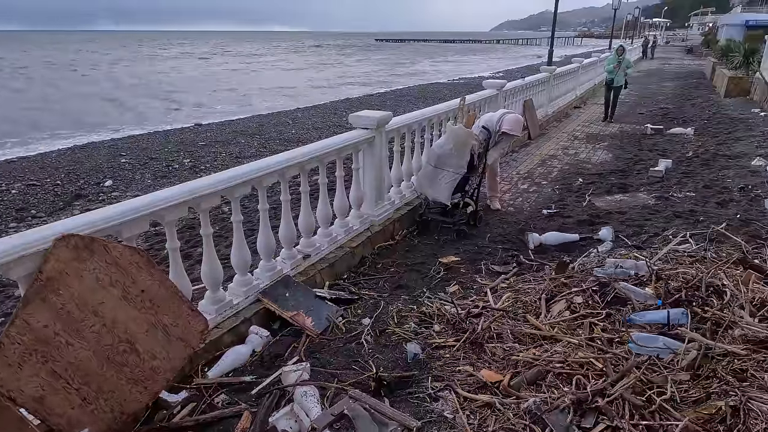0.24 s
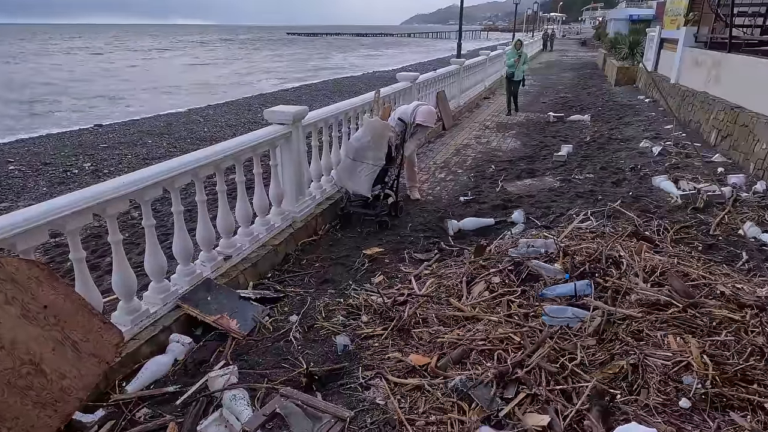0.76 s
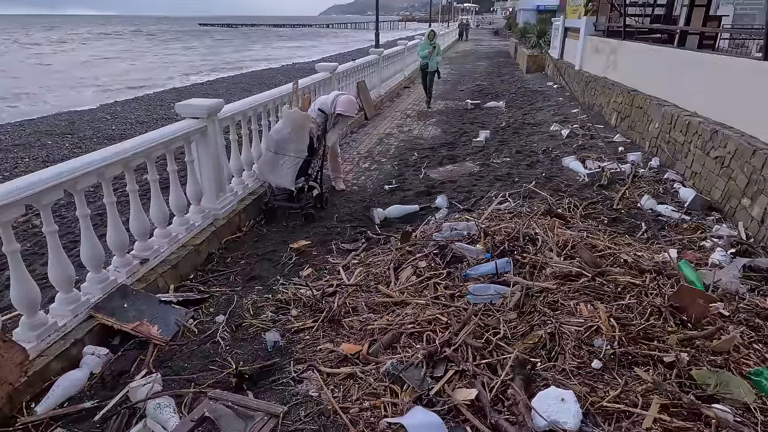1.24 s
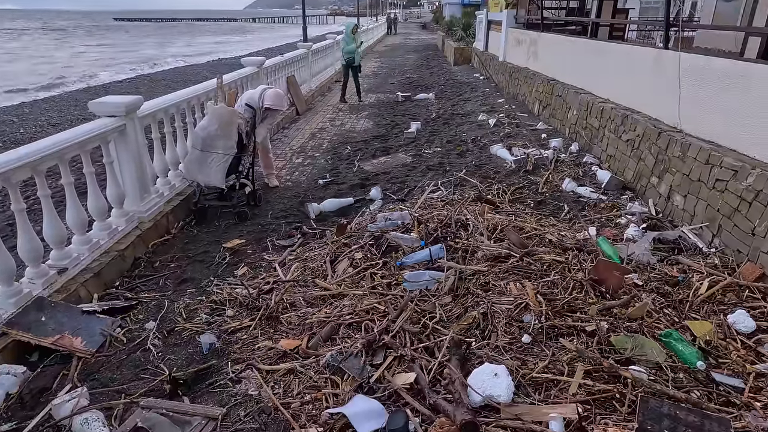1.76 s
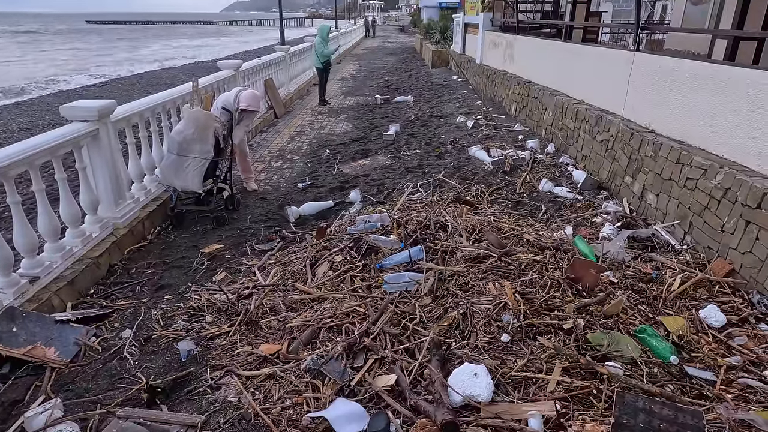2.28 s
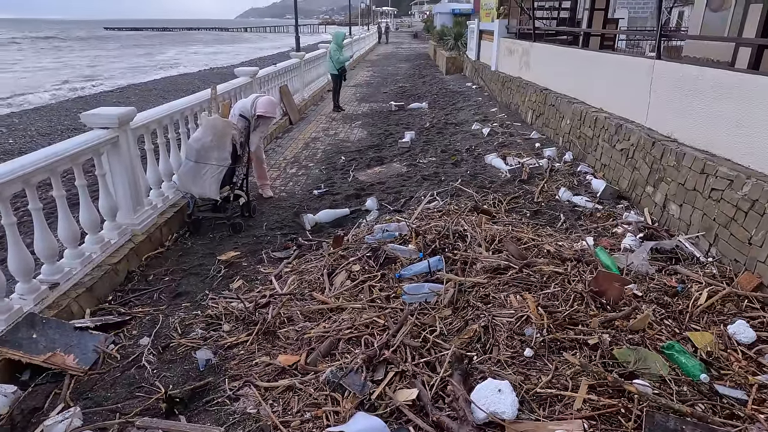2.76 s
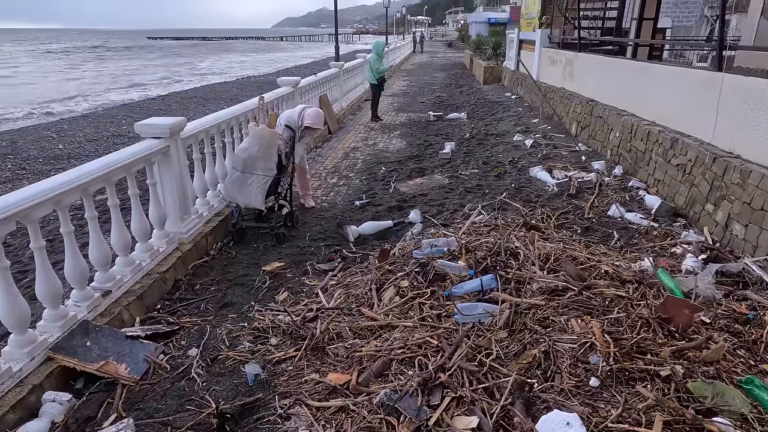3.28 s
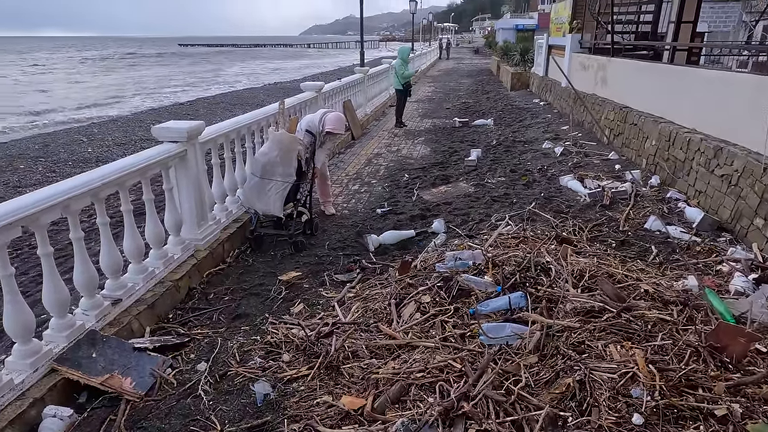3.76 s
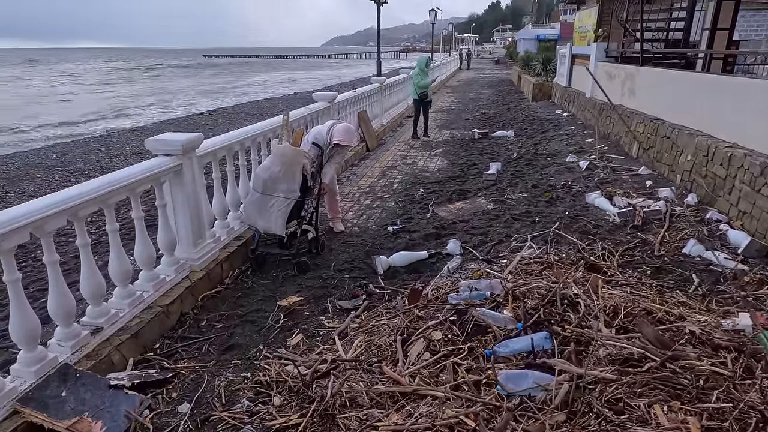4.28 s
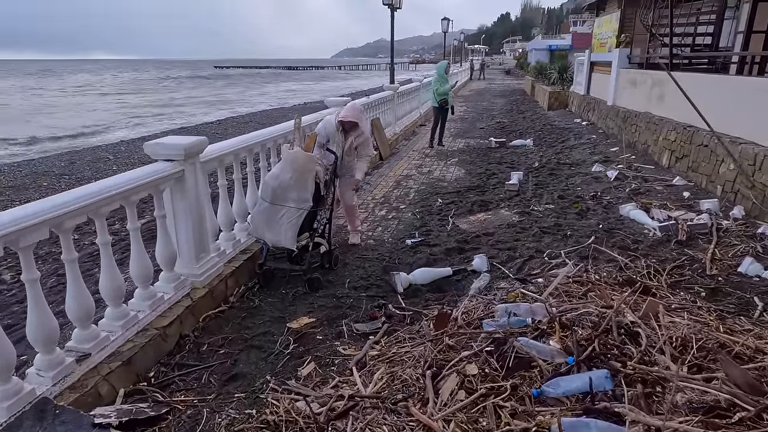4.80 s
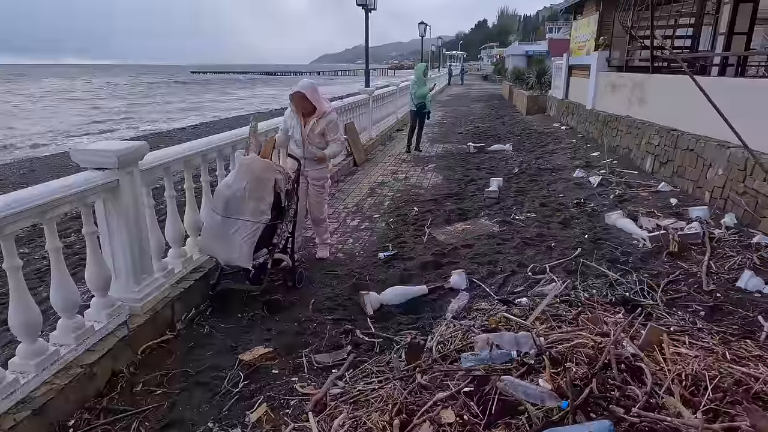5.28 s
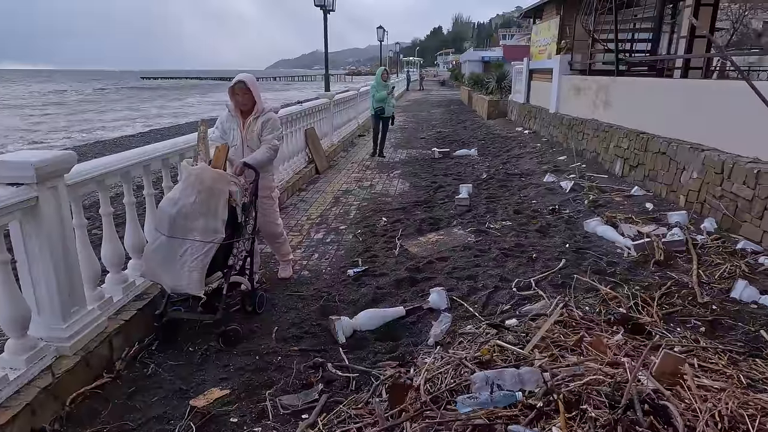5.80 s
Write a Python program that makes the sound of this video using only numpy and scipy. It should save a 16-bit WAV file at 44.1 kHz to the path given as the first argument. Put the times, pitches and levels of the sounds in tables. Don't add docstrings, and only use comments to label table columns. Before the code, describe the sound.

Rough sea beside a pebble beach: fading wash, a loud handling thump, rising surf roar with fizzing foam, gusts and a late knock.

```python
import sys
import numpy as np
from scipy import signal
from scipy.fft import rfft, irfft, next_fast_len
from scipy.io import wavfile
from scipy.ndimage import uniform_filter1d

SR = 44100
rng = np.random.default_rng(int(sys.argv[2]) if len(sys.argv) > 2 else 0)


def boost(x):
    u = np.asarray(x, float) / 20
    return 10 ** u


def output_pcm(signal):
    pcm = np.clip(np.atleast_2d(signal).T, -1, 1) * 32767
    wavfile.write(sys.argv[1], SR, np.round(pcm).astype(np.int16))


N = 266364

# time_s, amount_db, bursting_share_db
FOAM_SHEET = [(0, -35, 5), (.5, -35, 4.5), (.82, -39, 3.5), (1.25, -39, 5), (1.75, -38, 3),
              (2.1, -36.5, 0.5), (3.0, -32.5, 1.5), (3.5, -31, 2), (4.45, -30.5, 2.5), (4.85, -31.5, 3),
              (5.25, -32, 2), (6.04, -31.5, 5)]


def read(points, hz):
    f, value = np.transpose(points)
    return np.interp(np.log(hz + 1), np.log(f + 1), value)


def evened(x):
    return x / np.sqrt(np.mean(abs(x) ** 2) + 1e-20)


def add(mix, start_s, sound):
    part = mix[round(start_s * SR):][:len(sound)]
    part += sound[:len(part)]


def column(table, index):
    rows = np.array(table)
    return np.interp(np.arange(N) / SR, rows[:, 0], rows[:, index])


def swells(rows):
    t = np.arange(N) / SR
    return sum(boost(db) * np.exp(-2 * ((t - s) / length) ** 2) for s, db, length in rows)


def churn(colour, patchy_db, flicker_db, size, tilt=0, knee_hz=1000):
    hop = size // 4
    frames = N // hop + 5
    hz = np.fft.rfftfreq(size, 1 / SR)
    real, imag, patches = rng.standard_normal((frames, len(hz), 3)).T
    patches = uniform_filter1d(patches, size=12, axis=0)
    patches = evened(uniform_filter1d(patches, size=10, axis=1))
    flicker = evened(uniform_filter1d(rng.standard_normal(frames), size=3))
    octaves_up = np.clip(np.log2((hz + 1) / knee_hz), -1.5, 1.5)[:, None]
    frame_starts = np.minimum(np.arange(frames) * hop, N - 1)
    tilt_db = octaves_up * (tilt * np.ones(N))[frame_starts]
    field_db = read(colour, hz)[:, None] + patchy_db * patches + flicker_db * flicker
    scale = np.sqrt(np.mean(boost(field_db) ** 2) * size / 3)
    spectra = (real + 1j * imag) * boost(field_db + tilt_db)
    return signal.istft(spectra, nperseg=size, noverlap=size - hop)[1][:N] / scale


def bursting_db():
    fizz_under_wash_db = -15
    return column(FOAM_SHEET, index=1) + column(FOAM_SHEET, index=2) + fizz_under_wash_db


def wind():
    # pitch_hz, density_db
    eddy_colour = [(10, -42.5), (30, -18.5), (50, -10), (90, -6.5), (160, -3.5), (250, -8), (400, -24.5),
                   (1500, -120)]
    # peak_s, level_db, length_s
    gusts = [(.12, -46, 0.12), (.36, -47, 0.12), (.62, -55, .14), (1.0, -73, .08), (1.3, -67, .05),
             (1.48, -62, .1), (1.92, -64, 0.044), (2.3, -48, 0.14), (2.43, -42.5, 0.076),
             (2.55, -52, 0.091), (2.69, -44.5, 0.043), (2.88, -56, 0.079), (3.05, -57, .08),
             (3.52, -48.5, 0.043), (3.75, -63, .08), (3.93, -49, 0.15), (4.22, -49, 0.19), (4.42, -61, .06),
             (4.6, -58, .06), (4.98, -47, 0.081), (5.1, -46, 0.11), (5.26, -53, .05), (5.39, -42, 0.044),
             (5.56, -49, .08), (5.7, -56, 0.072), (5.86, -54, 0.13), (6.04, -50, .04)]
    lull_db = -59.5
    strength = boost(lull_db) + swells(gusts)
    return boost(-0.5) * strength * churn(eddy_colour, 0.85, 1.1, size=2048)


def scuffs():
    # pitch_hz, density_db
    grit_colour = [(800, -70), (4000, -10), (6000, 0), (8000, -8), (9300, -14), (10500, -11), (12500, -22),
                   (15000, -36), (20000, -60)]
    # middle_s, level_db, length_s
    drags = [(.34, -55, .07), (.62, -59.5, .022), (1.02, -63, .03), (1.2, -53.5, .035), (1.71, -57.5, .04),
             (1.91, -58.5, .035), (3.45, -60, .07), (3.93, -60, .07), (4.33, -61, .05), (4.79, -55.5, .12),
             (5.22, -61, .025), (5.56, -62, .04)]
    return swells(drags) * churn(grit_colour, 1.2, 1.6, size=256)


def knocks():
    # start_s, peak_db, pitch_hz, t60_s, sag_per_s
    pushes = [
        (.5485, -6, 140, .042, 75),
        (5.146, -13, 385, .085, 5),
        (5.1515, -11, 600, .045, 1),
        (5.152, -17, 300, .06, 3),
    ]
    out = np.zeros(N)
    t = np.arange(SR // 4) / SR
    for start_s, peak_db, pitch_hz, t60_s, sag in pushes:
        turns = np.cumsum(pitch_hz / (1 + sag * t)) / SR
        swell = 1 - np.exp(-(t / (0.12 * t60_s)) ** 2)
        decay = boost(peak_db - 60 * t / t60_s + 4.0)
        add(out, start_s, decay * swell * np.sin(2 * np.pi * turns))
    return out


def mist():
    # pitch_hz, density_db
    mist_colour = [(8000, -40), (8950, -5), (9400, -1.5), (10300, 0), (11000, -4), (12000, -11.5),
                   (13200, -19.5), (14200, -26), (15200, -33), (20000, -55)]
    level_db = -69.5 + 0.75 * (bursting_db() + 45)
    return boost(level_db) * churn(mist_colour, 0.7, 0.6, size=256)


def fizz():
    # pitch_hz, density_db
    fizz_colour = [(500, -80), (2500, -17), (4000, -7), (5000, -10), (6300, -16), (7500, -23),
                   (8700, -34.5), (9300, -38), (11000, -80.5)]
    return boost(bursting_db() + 3.5) * churn(fizz_colour, 0.7, 0.35, size=256)


def wash():
    # pitch_hz, density_db
    wash_colour = [(100, -74.5), (600, -33), (1200, -8), (1600, -1.5), (2000, -1.5), (2750, -1),
                   (3200, -3.5), (4200, -9.5), (5500, -19), (7000, -49), (10000, -100)]
    level_db = column(FOAM_SHEET, index=1) + 0.55
    tilt = 0.39 * column(FOAM_SHEET, index=2)
    return boost(level_db) * churn(wash_colour, 0.65, 0.47, size=512, tilt=tilt, knee_hz=2400)


def roar():
    # pitch_hz, density_db
    roar_colour = [(15, -87.5), (90, -38), (200, -17), (300, -7.5), (420, -6.5), (560, 1), (700, 0),
                   (880, -1.5), (1100, -3), (1400, -13.5), (2000, -31.5), (6000, -110)]
    # time_s, force_db, bubble_tilt_db_per_octave (small bubbles up)
    breaker = [(0, -23, -2), (.55, -25, -2.5), (.81, -30.5, 2), (1.35, -27.5, 2), (1.6, -23.5, 1),
               (2.0, -22, -1.5), (2.5, -21, 1.5), (2.85, -20.5, 1), (3.45, -19.5, 2), (4.0, -19, 1.5),
               (4.4, -19.5, 0.5), (5.0, -18.5, -1), (5.35, -19.5, .5), (5.75, -19.5, 0), (6.04, -21, -2)]
    level_db = column(breaker, index=1)
    tilt = 0.62 * (level_db + 19) + column(breaker, index=2)
    return boost(level_db - 5.0) * churn(roar_colour, 0.61, 0.084, size=1024, tilt=tilt, knee_hz=620)


def scene():
    near = wind() + scuffs() + knocks()
    sea = mist() + fizz() + wash() + roar()
    return (near + sea)[None]


def low_pass(x):
    return signal.sosfilt(signal.butter(12, 15130, fs=SR, output="sos"), x)


def record(dry):
    duck_at_s, duck_db, onset_s, recover_s = 5.165, -3, 0.0055, 0.061
    since = np.arange(N) / SR - duck_at_s
    dry = dry * boost(duck_db * np.clip(since / onset_s, 0, 1) * np.exp(-abs(since) / recover_s))

    lift_low_hz, lift_high_hz, lift_db = 329.6, 913.5, 6.5
    # centre_hz, width_below_hz, width_above_hz, depth_db
    dips = [
        (320, 10, 10, -7),
        (9000, 38, 60, -21),
        (9090, 60, 90, -11),
    ]
    size = next_fast_len(N + SR)
    hz = np.fft.rfftfreq(size, 1 / SR)
    gain_db = lift_db / 2 * (np.tanh((hz - lift_low_hz) / 17.0) - np.tanh((hz - lift_high_hz) / 14))
    for centre_hz, below_hz, above_hz, depth_db in dips:
        width_hz = np.where(hz < centre_hz, below_hz, above_hz)
        gain_db = gain_db + depth_db / (1 + ((hz - centre_hz) / width_hz) ** 2)
    return low_pass(irfft(rfft(dry, size) * boost(gain_db), size)[:, :N])


dry = scene()
out = record(dry)
output_pcm(out)
```